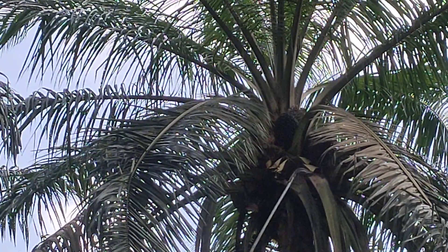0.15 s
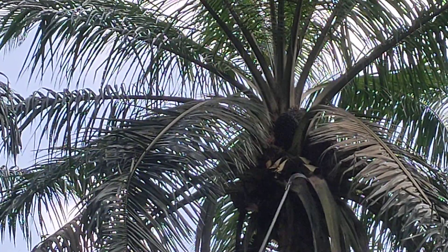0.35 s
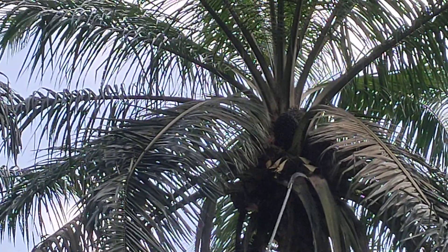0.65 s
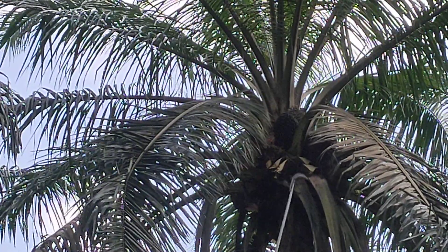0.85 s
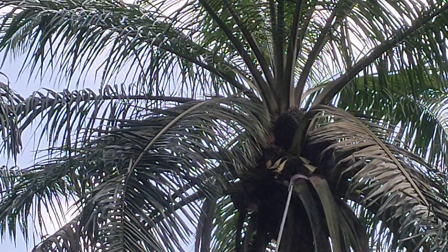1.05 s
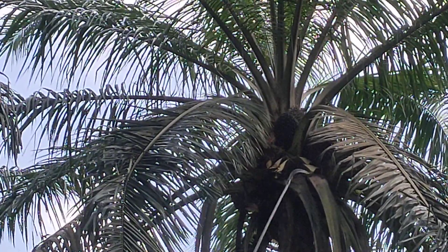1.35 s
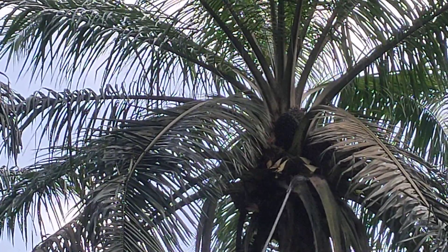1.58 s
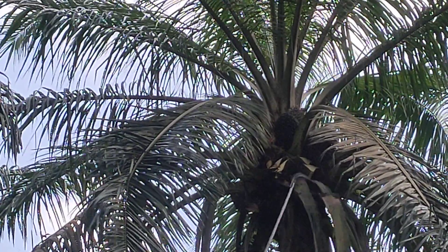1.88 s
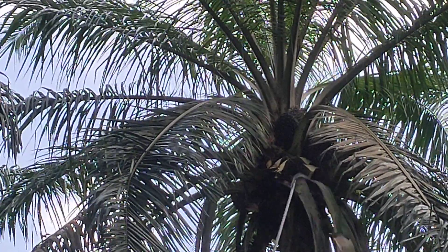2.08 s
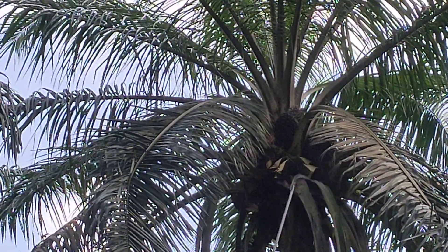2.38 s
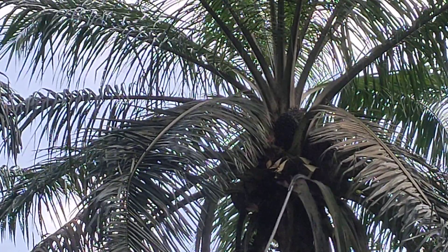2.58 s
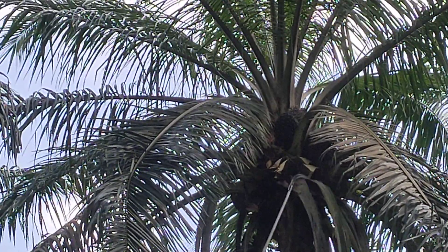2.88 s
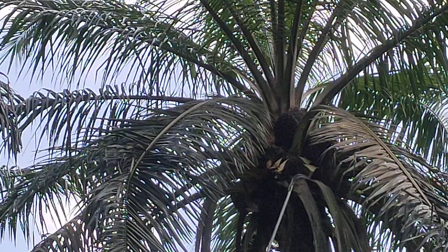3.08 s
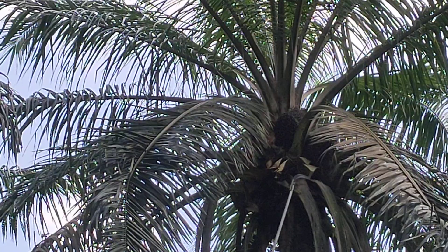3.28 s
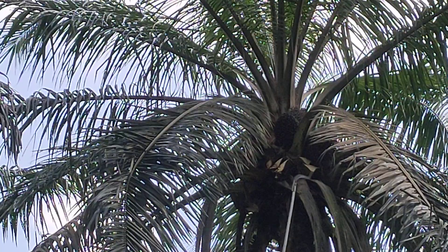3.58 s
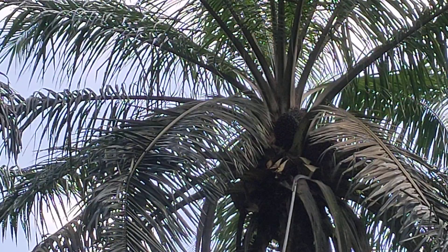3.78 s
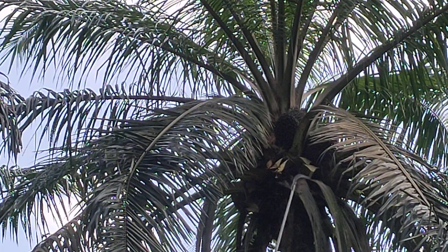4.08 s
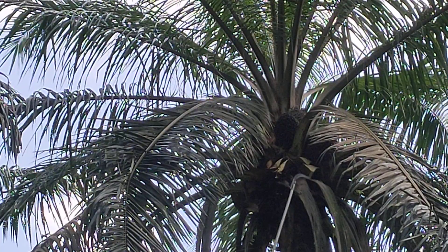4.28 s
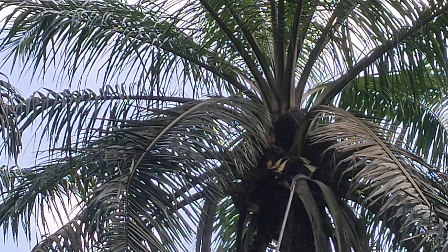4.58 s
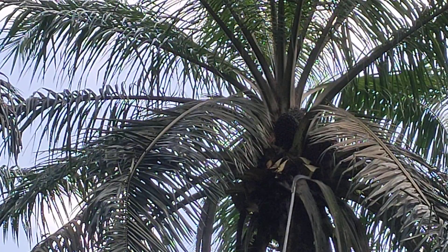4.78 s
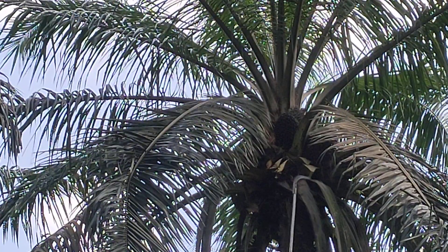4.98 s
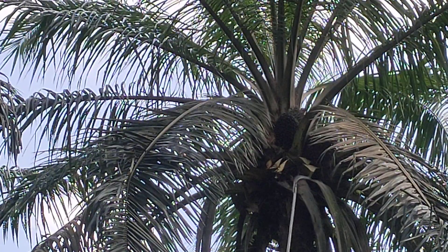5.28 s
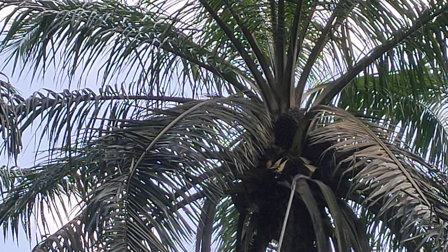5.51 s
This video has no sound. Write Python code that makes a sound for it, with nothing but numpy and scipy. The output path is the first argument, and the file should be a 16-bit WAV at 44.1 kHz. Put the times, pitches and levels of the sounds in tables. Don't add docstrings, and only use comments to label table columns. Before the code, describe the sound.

Outdoor stereo phone sound in a palm grove: constant high insect hiss, soft low wind buffeting, and a near bird's brief falling whistle at about 0.2, 1.0, 1.8, 2.6, 4.3 and 5.0 s. From 0.24 to 0.9 s a blade on a long metal tube knocks in irregular clusters, hollow and ringing around 1 kHz, hardest near 0.37 s, with leaf rustle. After a lull, light scrapes from 1.4 s lead to the loudest blows at 1.62-1.66 s, with a sharp leafy swish as the frond tears. The blade slips free with small clacks near 2.0 s. Dry leaflets rustle and slap downward, densest from 2.4 to 3.3 s. A swelling rush meets a heavy, blunt low thump at 3.53 s, with short grove echo. Rustling fades by about 4 s, while wind gusts peak near 3.55 and 4.2 s. Faint taps come at 4.97-5.16 s, and distant wavering, rising whistles close the scene.

```python
import sys
import numpy as np
from scipy import signal
from scipy.fft import rfft, irfft, next_fast_len
from scipy.io import wavfile
from scipy.ndimage import uniform_filter1d, map_coordinates

SR = 44100
rng = np.random.default_rng(int(sys.argv[2]) if len(sys.argv) > 2 else 0)


def volts_from_decibels(level):
    exponent = np.asarray(level, float) / 20
    return 10 ** exponent


def transcribe(signal):
    frames = np.atleast_2d(signal).T
    limited = np.clip(frames, -1, 1)
    pcm = np.round(limited * 32767).astype(np.int16)
    wavfile.write(sys.argv[1], SR, pcm)


N = 249165

# frequency in Hz, likeness 0-1.
NEAR_LIKENESS = [(60, 1), (330, 0.89), (770, 0.59), (1500, 0.285), (3000, 0.25), (6000, 0.304),
                 (10000, 0.081), (15000, 0.4)]
# start in seconds, peak in dB, centre in Hz.
LEAFLET_SLAPS = [(1.9673, -30.5, 3590), (1.9864, -34.5, 5140), (2.205, -30.5, 2640), (2.287, -33.5, 6330),
                 (2.395, -25.5, 6470), (2.456, -31.5, 3080), (2.522, -29, 4720), (2.5511, -30, 3150),
                 (2.5835, -33, 3130), (2.6041, -25.5, 5150), (2.6273, -26, 3730), (2.6918, -24, 4940),
                 (2.753, -26.5, 5170), (2.8023, -26.5, 5630), (2.838, -24, 4450), (2.869, -31.5, 2130),
                 (2.888, -31, 4950), (2.9007, -23, 5020), (2.919, -23, 3900), (2.9317, -24.5, 5470),
                 (2.9658, -33, 5460), (3.0152, -26.5, 4400), (3.087, -26.5, 2700), (3.1113, -27, 5000),
                 (3.1287, -24.5, 3350), (3.1541, -33, 6020), (3.1821, -25.5, 6300), (3.2864, -26, 4830),
                 (3.472, -24.5, 4490), (4.126, -38.5, 3430), (2.649, -27, 6200), (2.703, -24.5, 5500),
                 (2.769, -31, 5000), (2.848, -29.5, 5000), (2.941, -30, 2800), (2.946, -32, 5500),
                 (2.934, -27.5, 2900), (3.137, -34, 6200), (3.147, -36, 6000), (3.305, -33, 4200),
                 (3.325, -31, 1800), (1.896, -33.5, 2500)]


def unit(x):
    return x / np.sqrt(np.mean(x ** 2) + 1e-20)


def level_db(power):
    return 10 * np.log10(power)


def along(points, hz):
    point_hz, value = np.transpose(points)
    return np.interp(np.log(hz + 1), np.log(point_hz + 1), value)


def hump(f, hz, width):
    return np.exp(-.5 * (np.log((f + 1) / hz) / width) ** 2)


def curves(rows):
    s, *columns = np.transpose(rows)
    return [np.interp(np.arange(N) / SR, s, column) for column in columns]


def wobble(rate_hz):
    knots = rng.standard_normal(int(N * rate_hz / SR) + 4)
    return map_coordinates(knots, [np.arange(N) * rate_hz / SR])


def swells(rows):
    peak_s, db, rise_s, fall_s = np.array(rows)[:, :4].T[..., None]
    late_s = np.arange(N) / SR - peak_s
    drop = np.maximum(-late_s / np.abs(rise_s), late_s / np.abs(fall_s))
    return volts_from_decibels(2 * db - 20 * drop)


def filtered(x, response):
    m = next_fast_len(x.shape[-1] + 8192)
    spectrum = rfft(x, m) * response(np.fft.rfftfreq(m, 1 / SR))
    return irfft(spectrum, m)[..., :x.shape[-1]]


def add(track, s, sound):
    part = track[..., round(s * SR):][..., :sound.shape[-1]]
    part += sound[..., :part.shape[-1]]


def rush(spectrum, likeness, patchy_db, grain_db=0):
    z = signal.stft(rng.standard_normal((2, N)), nperseg=256)[2]
    field = uniform_filter1d(rng.standard_normal(z.shape[1:]), 6, 0)
    field = uniform_filter1d(field, 8, 1)
    pair = signal.istft(z * volts_from_decibels(patchy_db * unit(field)), nperseg=256)[1][:, :N]
    pair = pair * volts_from_decibels(grain_db * wobble(400))

    def mid_side(hz):
        angle = np.arccos(np.clip(along(likeness, hz), -1, 1)) / 2
        return volts_from_decibels(along(spectrum, hz)) * [np.cos(angle), np.sin(angle)]

    mid, side = filtered(pair, mid_side)
    return unit(np.array([mid + side, mid - side]))


def background():
    # frequency in Hz, level in dB per Hz.
    rumble_spectrum = [(8.8, -37.5), (15, -2.5), (34, -5.5), (87, -17.5), (108, -60), (140, -19.5),
                       (180, -54.5), (310, -120)]
    drone_spectrum = [(53, -25), (90, 1), (152, -9), (194, 1), (227, -5), (389, -13.5), (462, -20),
                      (603, -22.5), (800, -20.5), (1040, -44), (1760, -120)]
    whoosh_spectrum = [(65, -31), (110, -1.5), (156, -0.5), (482, -9), (900, -18.5), (1170, -39),
                       (1980, -120)]
    insect_spectrum = [(290, -21.5), (500, -21.5), (942, -1.5), (1060, -1), (1700, 0.5), (1910, 0),
                       (3110, 3), (4330, 4), (4790, 10), (6000, -11.5), (6900, 5.5), (7500, 4.5),
                       (9410, -17), (11200, -9), (12000, -16), (15600, -10)]
    # frequency in Hz, likeness 0-1.
    far_likeness = [(60, 0.63), (380, 0.166), (2380, 0.053), (15000, 0.031)]
    # peak in seconds, peak in dB, rise and fall in seconds per 10 dB.
    gusts = [(.03, -52, 2.1, 0.4), (.5, -52, 0.3, 0.2), (1.66, -58.5, 0.25, .5),
             (2.41, -49.5, 0.1262, 0.06), (2.75, -56, 1.16, 1.6), (3.19, -56, 0.45, 0.56),
             (3.55, -44, 0.2, 0.32), (3.85, -58, -0.3, -0.2), (4.14, -45.5, -0.2, 0.0928),
             (4.25, -44, 0.07, 0.1362), (4.62, -53, 0.15, 0.15), (5.3, -56.5, 1, -1)]
    # peak in seconds, peak in dB, rise and fall in s per 10 dB.
    pushes = [
        (.04, -56, -0.5, 0.1),
        (.45, -54.5, 0.6, 0.6),
        (1.6, -50.5, 0.13, 0.3542),
        (2.5, -60.5, 1, 1.5),
        (3.34, -52.5, 0.07, 0.3855),
        (3.5, -42.5, 0.1168, -0.02),
        (3.58, -40, 0.0455, 0.0246),
        (3.7, -50, -0.1, 0.03),
        (4.1, -55, 1, 1.5),
    ]
    calm_db, still_db, insect_db = -63.5, -66.5, -65

    buffet_db = level_db(swells(gusts).sum(0) + volts_from_decibels(2 * calm_db))
    air_db = level_db(swells(pushes).sum(0) + volts_from_decibels(2 * still_db))
    buffet = volts_from_decibels(buffet_db + 3.5) * rush(rumble_spectrum, [(25, 0.67), (80, 0.81)], patchy_db=2.0)
    push = np.clip((air_db + 56.0) / 7, 0, 1)
    air = np.sqrt(1 - push) * rush(drone_spectrum, NEAR_LIKENESS, patchy_db=1.5)
    air += np.sqrt(push) * rush(whoosh_spectrum, [(300, 0.97)], patchy_db=1.8)
    insect_level = volts_from_decibels(insect_db + 3.0 + 0.95 * wobble(3.46))
    insects = insect_level * rush(insect_spectrum, far_likeness, patchy_db=0.5)
    return buffet + volts_from_decibels(air_db + 0.31) * air + insects


def chirp(middle_s, db, lead, tail, dip_hz):
    # seconds from middle, pitch in Hz, level in dB.
    fall = [(-.085, 4600, -26), (-.058, 4454, -14), (-.04, 4200, -18), (-.02, 3800, -11.5), (0, 3530, -1),
            (.018, 3050, -4), (.032, 2550, -11.5), (.04, 2370, -13), (.052, 2300, -24)]
    dip_width, dip_db = 0.019, 14

    s, hz, shape_db = np.transpose(fall)
    t = np.linspace(s[0], s[-1], num=60)
    hz = np.interp(t, s, hz)
    call_db = db + np.interp(t, s, shape_db) - dip_db * hump(hz, dip_hz, dip_width)
    return np.transpose([middle_s + t * np.where(t < 0, lead, tail), hz, call_db])


def birds():
    # time in seconds, pitch in Hz, level in dB.
    whistles = [
        [(0.0, 3450, -70.5), (0.036, 3250, -63), (0.085, 3080, -65.5)],
        [(4.68, 2310, -77), (4.7, 2124, -62.5), (4.794, 2038, -58.5), (4.83, 2000, -89)],
        [(5.275, 1394, -82.5), (5.33, 1541, -76), (5.366, 1524, -74), (5.378, 1542, -84)],
        [(5.39, 1648, -82), (5.408, 1661, -68.5), (5.456, 1820, -75), (5.478, 1894, -63.5), (5.524, 2001, -75),
         (5.548, 2015, -62), (5.578, 2086, -61), (5.614, 2059, -62), (5.63, 2100, -82)],
        [(5.55, 3450, -74), (5.562, 4100, -65), (5.573, 4350, -66), (5.582, 5170, -69.5), (5.64, 5220, -76)],
    ]
    # middle in seconds, peak in dB, stretch of lead, stretch of tail, cancelled Hz.
    near_calls = [
        (.2, -50, 0.843, 0.836, 2650),
        (1.041, -51.5, 1.04, 0.9, 3272),
        (1.792, -48, .9, 1.03, 3950),
        (2.571, -51.5, 0.83, 1.06, 2680),
        (4.259, -47, .8, 1.25, 3136),
        (5.045, -53, .8, 1.16, 3250),
    ]
    # start in seconds, length in seconds, first Hz, last Hz, level in dB.
    faint_notes = [(0, 0.1, 5154, 5140, -65), (.11, 0.064, 4016, 4006, -66.5),
                   (1.19, 0.0585, 3965, 4000, -72), (4.118, 0.028, 2070, 1984, -62.5),
                   (4.31, 0.022, 1540, 1456, -66.5), (4.374, 0.0306, 5130, 4956, -63),
                   (4.55, 0.42, 3373, 3340, -70.5), (4.58, 0.043, 1720, 2615, -64.5),
                   (4.625, 0.111, 2600, 2550, -68), (5.408, .025, 3950, 3850, -65),
                   (5.57, .03, 4600, 4830, -66.5), (5.625, 0.036, 2500, 2540, -71.5)]
    peep_fade_db = 6.5

    out, flicker, waver = np.zeros(N), volts_from_decibels(1.8 * wobble(80)), 1 + 0.0078 * wobble(160)
    calls = [chirp(*row) for row in near_calls] + whistles
    for s, length_s, first_hz, last_hz, db in faint_notes:
        calls.append([(s, first_hz, db), (s + length_s, last_hz, db - peep_fade_db)])
    for call in calls:
        s, hz, db = np.transpose(call)
        i = np.arange(round(s[0] * SR), min(round(s[-1] * SR), N))
        ends = np.clip(np.minimum(i - i[0], i[-1] - i) / SR / 0.0017, 0, 1)
        phase = 2 * np.pi * np.cumsum(np.interp(i / SR, s, hz) * waver[i]) / SR
        level = volts_from_decibels(np.interp(i / SR, s, db) + 4.5)
        out[i] += ends * flicker[i] * level * np.sin(phase)
    return out


def grove(x, decays):
    hz, t, z = signal.stft(rng.standard_normal((2, SR)), SR, nperseg=256)
    tail = signal.istft(z * volts_from_decibels(-60 * t / along(decays, hz)[:, None]), SR, nperseg=256)[1]
    tail = tail[0] + filtered(tail - tail[0], lambda f: f ** 2 / (f ** 2 + 700 ** 2))
    delayed = np.pad(x, (300, 0))[None]
    return signal.fftconvolve(delayed, tail / np.linalg.norm(tail[0]), axes=1)[:, :N]


def motion():
    # peak in seconds, peak in dB, rise and fall in seconds
    # per 10 dB, heavy-leaf share in dB.
    sway_events = [(0, -58, 1.1, -0.53, -6), (0.279, -52.5, 0.1, 0.093, -2),
                   (.38, -50, -0.03, 0.1714, -2.5), (.48, -49, 0.14, 0.3413, -4.5),
                   (1.28, -65, -1, 1.65, -1), (1.59, -55.5, -0.12, -2, -5), (1.624, -39, -0.01, 0.1043, -1),
                   (2.0, -49, 0.05, -0.7, -4.5), (3.292, -47.5, -0.1, 0.3874, -19),
                   (3.57, -34, 0.1245, 0.1095, -9.5), (3.74, -52, 0.36, 0.38, -10),
                   (4.23, -57.5, -0.11, 0.55, -4.5), (5.2, -67.5, -2, 0.3, -6)]
    # time in seconds, rustle in dB.
    descent_rows = [(1.7, -50), (2.4, -48.5), (2.69, -45), (2.86, -46), (2.93, -41), (3.04, -44.5),
                    (3.16, -44.5), (3.27, -55)]
    slide_fade_s, slide_heavy_db = 0.03, -10
    sheen_db, sheen_lag = -13.5, 0.077

    t = np.arange(N) / SR
    slide_db, = curves(descent_rows)
    outside_s = np.maximum(np.maximum(descent_rows[0][0] - t, t - descent_rows[-1][0]), 0)
    slide = volts_from_decibels(2 * slide_db - 20 * outside_s / slide_fade_s)
    sways = swells(sway_events)
    total = slide + sways.sum(0)
    heavy = volts_from_decibels(2 * slide_heavy_db) * slide + volts_from_decibels(2 * np.array(sway_events)[:, 4]) @ sways
    total_db = level_db(total)
    return total_db, level_db(heavy / total), sheen_db - sheen_lag * (total_db + 51.5)


def patter():
    window_s, patter_db, spread_db, t60_s = 0.036, -14.5, 6.5, 0.0239

    draws = rng.random((len(LEAFLET_SLAPS), 5, 2))
    s, db, _ = np.transpose(LEAFLET_SLAPS)[..., None]
    at = ((s + window_s * draws[..., 0]) * SR).astype(int).ravel()
    strength = volts_from_decibels(db + patter_db - spread_db * draws[..., 1]).ravel()
    strikes = np.bincount(at, strength, N)
    t = np.arange(SR // 20) / SR
    strike = volts_from_decibels(-60 * t / t60_s) * (1 - np.exp(-t / 0.00108))
    return signal.fftconvolve(strikes, strike)[:N].clip(0)


def ground(x):
    # time in seconds, first notch in Hz, echo share 0-1, dimming above 11.5 kHz 0-1.
    bounce = [(1.7, 500, .3, 0), (2.2, 660, .6, .2), (2.52, 830, .52, .3), (2.6, 880, .52, .97),
              (3.04, 1180, .55, .97), (3.28, 1500, .45, .5), (3.4, 2500, 0, 0)]

    notch_hz, share, dimming = curves(bounce)
    late = np.arange(N) - SR / (2 * notch_hz)
    dull = filtered(x, lambda f: 1 / (1 + (f / 2300) ** 2))
    echo = np.array([map_coordinates(side, [late]) for side in dull])
    both = (x + share * echo) / np.sqrt(1 + share ** 2)
    top = filtered(both, lambda f: 1 / (1 + (11500 / (f + 1)) ** 16))
    return both - np.clip(dimming, 0, 1) * top


def fronds():
    # frequency in Hz, level in dB per Hz.
    leaf_spectrum = [(880, -16.5), (1500, -7), (1980, -6), (2490, -4), (5560, -2), (7000, -2.5),
                     (8740, -9.5), (10000, -15.5), (13000, -19.5), (22000, -120)]
    heavy_spectrum = [(290, -11), (500, -14), (646, -4.5), (915, -9), (1720, -11.5), (2400, -11),
                      (3120, -11.5), (5280, -120)]
    sheen_spectrum = [(5000, -8), (8500, -5.5), (11100, -18), (12300, -30), (15600, -13.5)]
    slap_t60_s, snap_db, snap_t60_s = 0.033, -5.5, 0.007

    leaf_db, heavy_db, sheen_db = motion()
    hiss = rush(leaf_spectrum, NEAR_LIKENESS, patchy_db=1.0, grain_db=1.0)
    hiss += volts_from_decibels(heavy_db - 3.0) * rush(heavy_spectrum, NEAR_LIKENESS, patchy_db=4.5)
    sheen = rush(sheen_spectrum, NEAR_LIKENESS, patchy_db=-0.5, grain_db=1.5)
    hiss += volts_from_decibels(sheen_db + 6.5 + 1.6 * wobble(15)) * sheen
    out = volts_from_decibels(leaf_db + 0.5 + 0.98 * wobble(60) + 0.64 * wobble(17)) * hiss

    grit = rush(leaf_spectrum, NEAR_LIKENESS, patchy_db=1.9, grain_db=2.5)
    t = np.arange(SR // 16) / SR
    onset = 1 - np.exp(-t / 0.0011)
    for s, db, hz in LEAFLET_SLAPS:
        burst = filtered(grit[:, round(s * SR):][:, :len(t)], lambda f: hump(f, hz, width=0.75))
        burst = burst / np.std(burst[:, t < .007])
        body = volts_from_decibels(db - 7.0 - 60 * t / slap_t60_s)
        snap = volts_from_decibels(db + snap_db - 60 * t / snap_t60_s)
        add(out, s - .0015, (body + snap) * onset * burst)
    return ground(out + patter() * grit[:, ::-1])


def pole():
    # start in seconds, peak in dB, pole colour in Hz,
    # colour width in ln Hz.
    knocks = [(0.238, -42.5, 1260, 0.216), (.266, -37, 1300, 0.23), (.29, -40, 1047, .2),
              (.315, -44, 1100, .25), (0.338, -40.5, 960, 0.23), (.376, -34, 1000, .3),
              (.394, -31, 1200, 0.29), (.415, -40.5, 1000, .3), (.458, -46.5, 1050, 0.22),
              (.55, -44, 1100, .3), (.597, -45.5, 1280, 0.224), (.757, -47.5, 1000, 0.29),
              (0.399, -30, 1174, 0.266), (0.509, -39, 1240, 0.33), (0.528, -39, 1236, 0.16),
              (0.615, -38.5, 740, 0.52), (0.646, -43, 1166, 0.24), (0.679, -37, 1030, 0.3),
              (0.739, -37, 926, 0.4), (.822, -41.5, 1050, .3), (.845, -49, 1150, 0.174),
              (0.883, -42, 1168, 0.51), (0.904, -45, 812, 0.157), (1.409, -48, 1125, 0.257),
              (1.47, -42.5, 969, 0.375), (1.521, -46, 770, 0.55), (1.485, -43.5, 1200, 0.4),
              (1.559, -45, 1345, 0.23), (1.568, -49, 945, 0.215), (1.595, -43, 2600, 0.225),
              (1.633, -26, 1450, .4), (1.644, -24, 1400, .35), (1.655, -27.5, 1200, 0.496),
              (1.664, -32, 1300, 0.57), (1.693, -48, 1000, 0.274), (1.773, -40.5, 902, 0.39),
              (1.892, -38.5, 1177, 0.63), (1.939, -47, 747, 0.17), (1.949, -44, 720, 0.14),
              (1.99, -35, 1790, .2), (2.013, -44, 1800, .15), (4.965, -48, 852, .2), (5.085, -48, 854, .2),
              (5.122, -54, 950, .2), (5.166, -51, 900, .2), (4.977, -50, 3600, .4)]
    clean_blows = [(0.272, -32, 1105, 0.212), (0.367, -25.5, 1200, 0.37), (0.81, -35.5, 1270, 0.35),
                   (1.6145, -29, 2400, 0.25), (1.6155, -17.5, 1200, 0.17), (1.6255, -22, 1250, 0.37),
                   (1.655, -26.5, 2200, 0.44), (1.975, -38, 815, 0.28), (1.982, -40, 750, .25),
                   (1.988, -37, 745, .2), (4.964, -42.5, 1400, 0.64), (5.083, -39, 1200, 0.75),
                   (5.152, -41, 1095, 0.45), (5.155, -37.5, 870, .2)]
    # start in seconds, peak in dB.
    edge_ticks = [
        (0.274, -36),
        (0.3715, -38),
        (.4021, -42),
        (.429, -37),
        (1.619, -33),
        (1.634, -41),
        (1.985, -39),
        (4.967, -56),
        (5.086, -61.5),
        (5.1592, -47),
    ]
    skid_db, clean_skid_db, skid_t60_s = -13.5, -22, 0.06
    ring_t60_s = 0.0527

    out, t = np.zeros(N), np.arange(SR // 5) / SR
    keep = volts_from_decibels(-60 * 0.00706 / ring_t60_s)

    def tube(f, hz, width):
        descent = np.exp(4j * np.pi * .0104 * 1000 ** 1.5 / np.sqrt(f + 60))
        round_trip = -np.exp(-4j * np.pi * .2843 * np.sqrt(f))
        radiated = hump(f, hz, width) / (1 + (640 / (f + 1)) ** 10)
        return radiated * descent / (1 - keep * round_trip)

    blows = [(row, skid_db) for row in knocks] + [(row, clean_skid_db) for row in clean_blows]
    for (s, db, hz, width), scrape_db in blows:
        scrape = volts_from_decibels(scrape_db - 60 * t / skid_t60_s) * rng.standard_normal(len(t))
        scrape[0] = 1
        ring = filtered(scrape, lambda f: tube(f, hz, width))
        add(out, s - .0062, volts_from_decibels(db - 6.5) * ring / np.abs(ring).max())
    for s, db in edge_ticks:
        noise = volts_from_decibels(-60 * t / .018) * rng.standard_normal(len(t))
        tick = filtered(noise, lambda f: hump(f, 7000, width=.42))
        add(out, s, volts_from_decibels(db) * tick / np.abs(tick).max())
    return out


def stalk():
    # centre in seconds, peak in dB, frequency in Hz, cycles.
    thumps = [(1.244, -57.5, 442, 2.5), (1.5914, -39, 650, 0.8), (1.598, -39.5, 325, 2.8),
              (3.519, -23, 291, 1.48), (3.53, -26, 62, 1.1), (3.5236, -19.5, 669, 3.9),
              (3.526, -37, 860, 6.1), (3.5275, -17.5, 380, 1.6), (3.532, -15, 268, 1.014),
              (3.546, -25.5, 145, 1.24), (3.575, -36.5, 700, 4.5), (3.538, -32, 694, 9.4),
              (3.472, -35.5, 337, 3.65), (3.482, -37.5, 655, 4.4), (3.495, -36, 421, 4.1),
              (3.582, -36, 211, 2.9)]

    out, t = np.zeros(N), np.arange(-SR // 25, SR // 25) / SR
    for s, db, hz, cycles in thumps:
        swell = np.exp(-2.5 * (t * hz / cycles) ** 2)
        add(out, s + t[0], volts_from_decibels(db) * swell * np.cos(2 * np.pi * hz * t))
    return out


def scene():
    # frequency in Hz, t60 in seconds.
    blow_decays = [(300, 0.433), (2000, 0.19), (3500, 0.876), (8000, 0.263)]
    bird_decays = [(1500, 0.33), (2400, 0.45), (3300, 1.29), (4500, 0.92), (8000, 0.396)]
    # delay in seconds, level in dB.
    trunk_echoes = [(.006, -12.5), (.011, -15), (.019, -17.5), (.031, -17)]

    song, taps, thud = birds(), pole(), stalk()
    echoes = grove(volts_from_decibels(-8.5) * taps + volts_from_decibels(-10.0) * thud, blow_decays)
    echoes += volts_from_decibels(-4.5) * grove(song, bird_decays)

    def off_trunks(f):
        return 1 + sum(volts_from_decibels(db) * np.exp(-2j * np.pi * f * s) for s, db in trunk_echoes)

    song = filtered(song, off_trunks)
    lag_samples = 1.6
    frond = filtered(thud + fronds(), lambda f: np.exp(np.outer([1j, -1j], np.pi * f * lag_samples / SR)))
    return taps + frond + song + echoes + background()


def band_limit(x):
    return signal.sosfilt(signal.butter(12, 15720, fs=SR, output="sos"), x)


def record(dry):
    # frequency in Hz, left minus right in dB.
    port_balance = [(25, 8), (70, 1.5), (300, 1.9), (1800, 2), (4200, 4.5), (6200, 6.5), (7600, 0.5),
                    (9000, -5), (11000, 1), (15000, -0.5)]
    ports = filtered(dry, lambda hz: volts_from_decibels(np.outer([.5, -.5], along(port_balance, hz))))
    return band_limit(ports)


dry = scene()
out = record(dry)
transcribe(out)
```